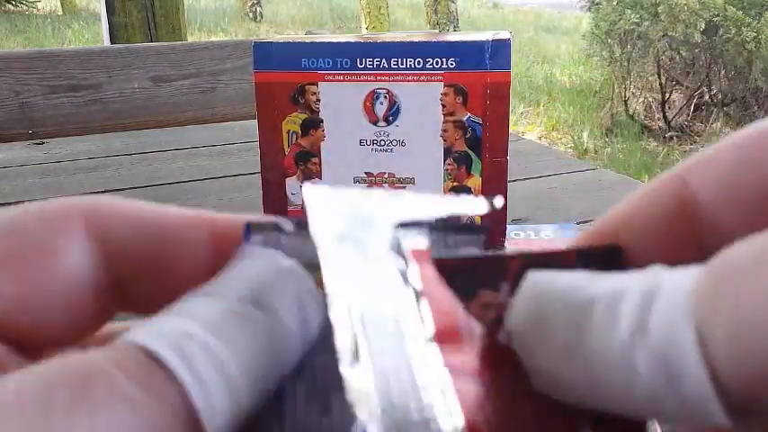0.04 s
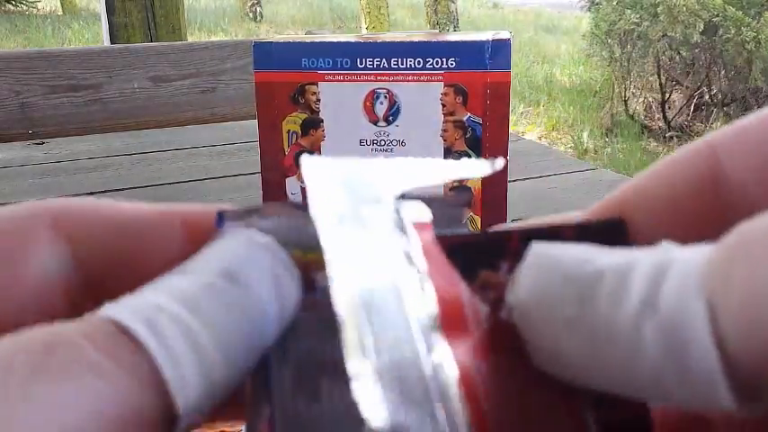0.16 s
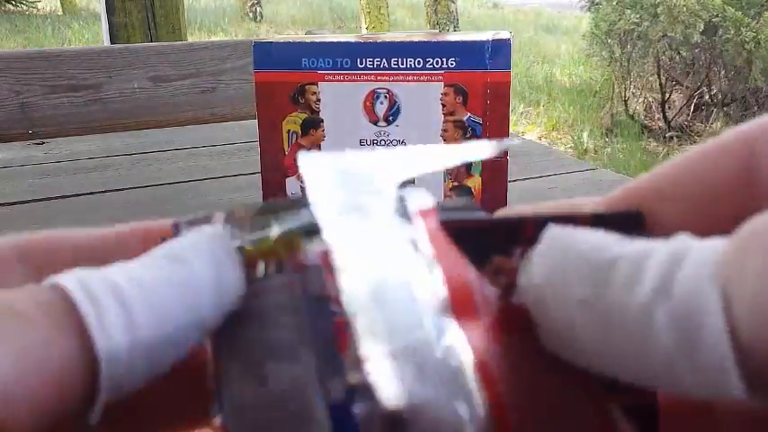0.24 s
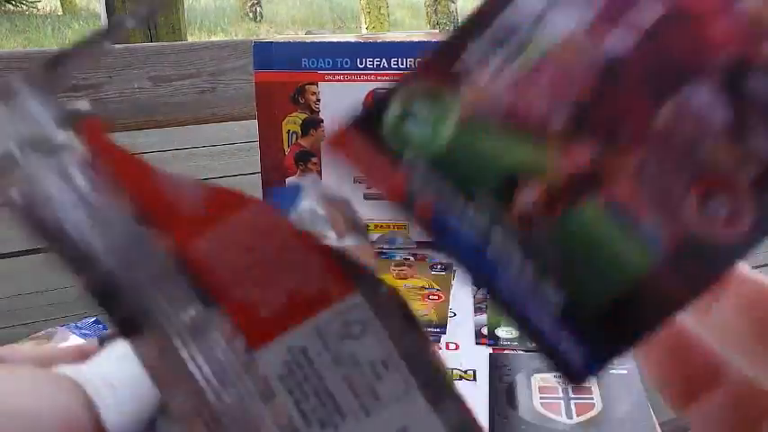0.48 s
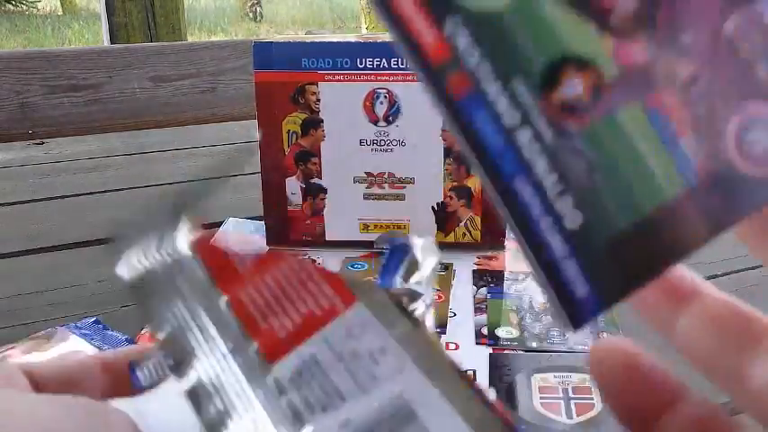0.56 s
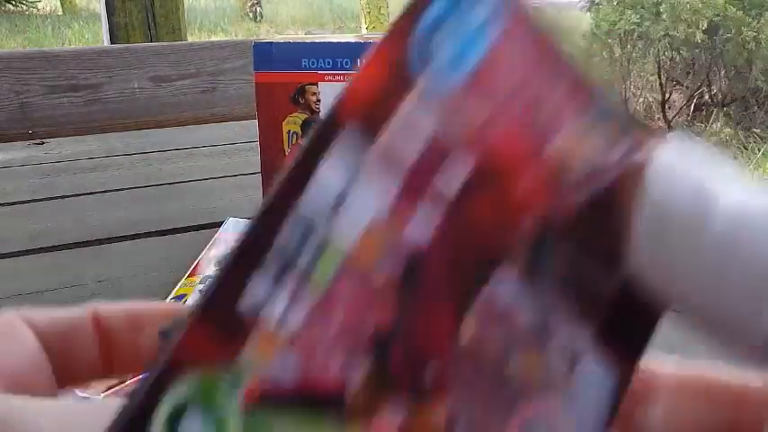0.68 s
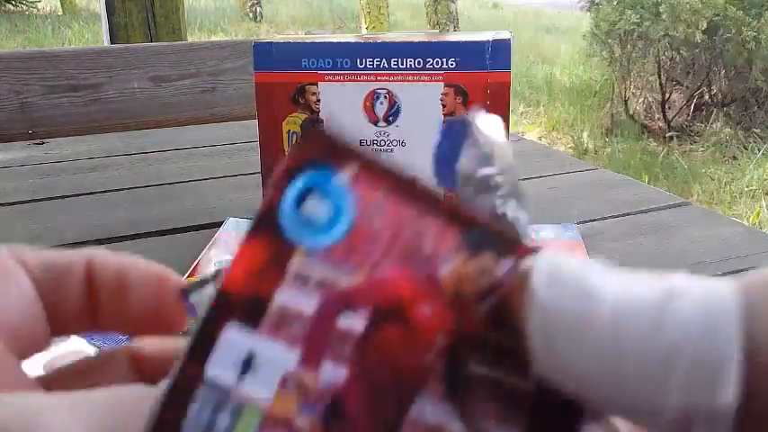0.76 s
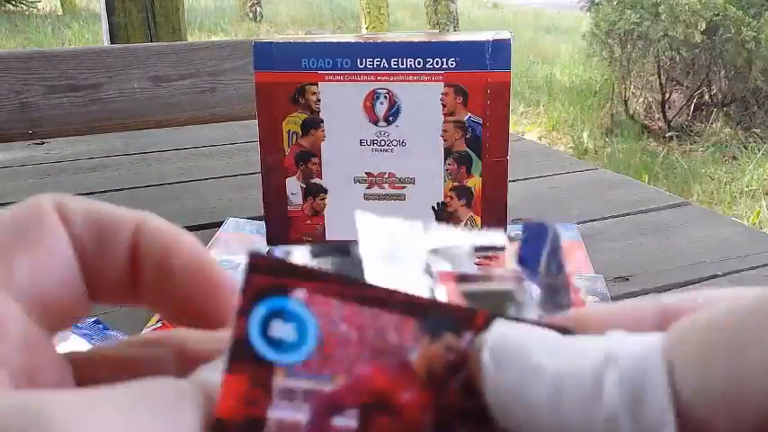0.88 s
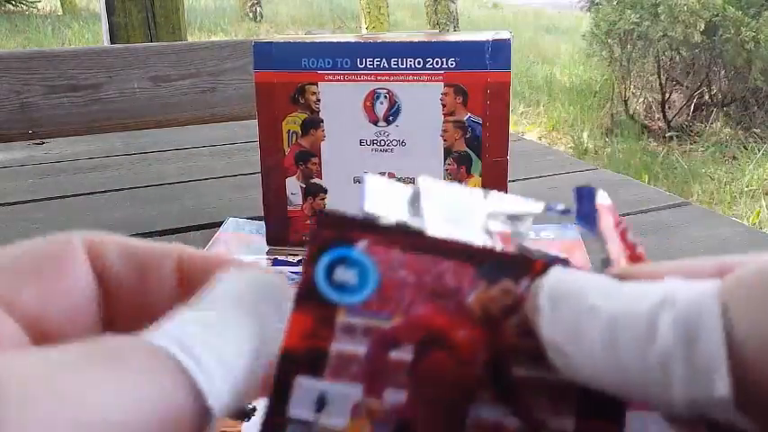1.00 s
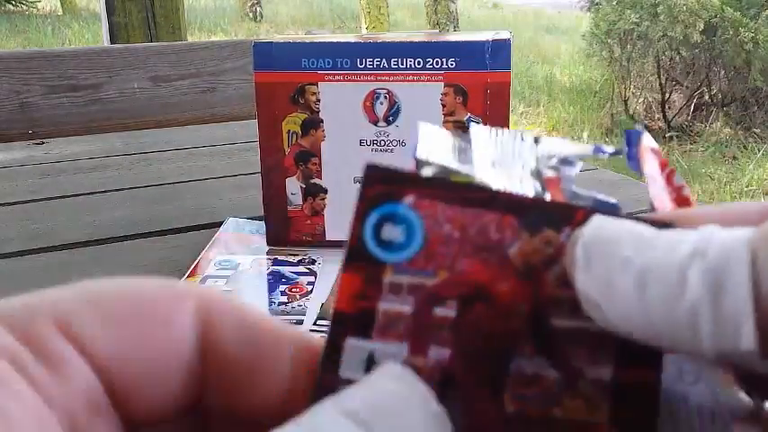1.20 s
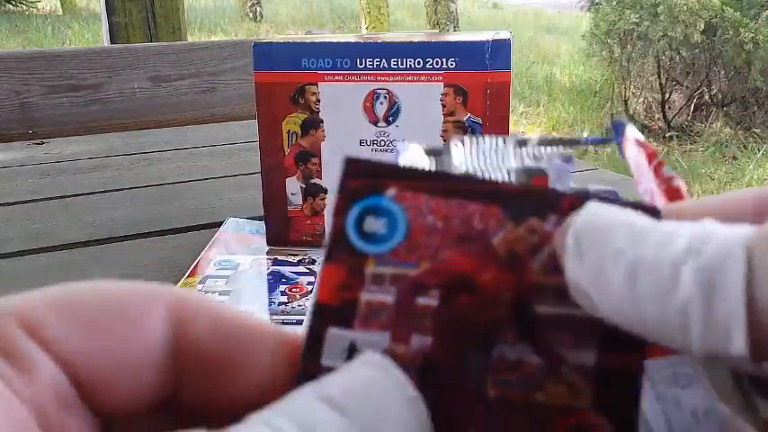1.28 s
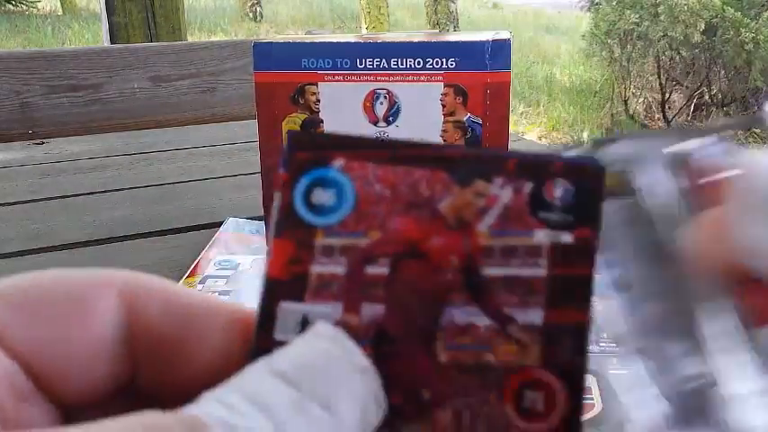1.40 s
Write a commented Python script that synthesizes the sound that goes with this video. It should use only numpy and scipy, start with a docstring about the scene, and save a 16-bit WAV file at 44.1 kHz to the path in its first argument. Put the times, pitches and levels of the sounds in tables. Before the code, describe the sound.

A foil packet crackles in the hands, very close, outdoors on a two-port camera microphone with dulled top treble. Sparse snaps begin at 0 s; dense, sharp crackle with low flexing runs 0.2-0.55 s. It quiets, then looser bursts return around 0.75-0.97 s. After a near pause from 1 s, a soft low card thud at 1.18 s and scattered snaps until 1.4 s. Faint rumble, hiss, rubbing; early wind puffs mostly left.

```python
"""Hands tear and crumple a small foil packet close to a two-port camera microphone, outdoors.
Rumble, hiss and a faint rub run throughout; puffs of wind, low tones mostly on the left, come in the first 1.1 s.
Crease snaps, short ringing noise bursts, start sparse over bouts of crackle made of tiny decaying grains.
They crowd from 0.2 to 0.55 s with low noise as the packet flexes, then thin out to a near pause after 1 s.
A card thuds once at 1.18 s, a pair of decaying low sines, and a few last snaps and crackles follow."""
import sys
import numpy as np
from scipy import signal
from scipy.fft import rfft, irfft, next_fast_len
from scipy.io import wavfile
from scipy.ndimage import uniform_filter1d, map_coordinates

SR = 44100
rng = np.random.default_rng(int(sys.argv[2]) if len(sys.argv) > 2 else 0)


def log_audio(samples):
    """Write samples as a 16-bit WAV file to the path given in sys.argv[1]."""
    # one column per channel
    frames = np.atleast_2d(samples).T
    # limit to full scale, then quantise
    limited = np.clip(frames, -1, 1)
    pcm = np.round(limited * 32767).astype(np.int16)
    wavfile.write(sys.argv[1], SR, pcm)


def magnitude_from_level(level_db):
    """Linear magnitude for a level in decibels (20 dB per decade)."""
    exponent = np.asarray(level_db, float) / 20
    return 10 ** exponent


N = 63945  # samples, 1.45 s


def unit(x):
    """Scales a sound or curve to rms 1."""
    return x / np.sqrt(np.mean(x ** 2) + 1e-20)


def along(points, hz):
    """Reads a curve of (Hz, value) points on a log pitch axis."""
    f, v = np.transpose(points)
    return np.interp(np.log(hz + 1), np.log(f + 1), v)


def wobble(rate):
    """A smooth random curve with rate knots a second."""
    knots = rng.standard_normal(int(N * rate / SR) + 4)
    return map_coordinates(knots, [np.arange(N) * rate / SR])


def filtered(x, response):
    """Multiplies the spectrum of x by a response of frequency."""
    m = next_fast_len(N + 8192)
    return irfft(rfft(x, m) * response(np.fft.rfftfreq(m, 1 / SR)), m)[..., :N]


def spans(start, length):
    """A gate that rises fast, holds and falls fast."""
    rise_s, fall_s = 0.00097, 0.0019
    t = np.arange(N) / SR
    return np.exp(np.minimum(0, np.minimum((t - start) / rise_s, (start + length - t) / fall_s)))


def patchy(patch_db):
    """Two noises with the same random patchiness in level over pitch and time."""
    z = signal.stft(rng.standard_normal((2, N + 256)), nperseg=128)[2]
    field = uniform_filter1d(rng.standard_normal(z.shape[1:]), size=3, axis=0)
    field = uniform_filter1d(field, size=3, axis=1)
    noise = signal.istft(z * magnitude_from_level(patch_db * unit(field)), nperseg=128)[1]
    return unit(noise[:, :N])


def foil_sound(dull, bright, pan, low_hz):
    """Colours a dull and a bright share of two noises by the foil and spreads them over both ports."""
    # Thin foil's spectrum, scaled to unit mean power. Each row: pitch in Hz, relative level in dB.
    foil_colour = [(59, -47), (100, 9), (265, 5.5), (480, -6), (673, -5.5), (2870, -4), (3940, -1.5),
                   (4710, -0.5), (7140, 0), (10600, -10), (11500, -25), (15000, -52), (22000, -120)]
    # Balance of the ports. Each row: pitch in Hz, left over right in dB.
    port_balance = [(60, -4), (300, -4.5), (620, -9), (1120, -3), (2010, -3), (3610, 0.5), (5500, -0.5),
                    (7000, -5.5), (8500, -13), (11600, -18.5)]
    # Likeness of the ports. Each row: pitch in Hz, share of the left sound common with the right (0 to 1).
    port_likeness = [(200, 0.27), (1000, 0.9), (2500, .3), (6000, .1)]
    tilt_hz = 3780  # crossover between dull and bright
    left_lag_s = 0.0001
    grid = np.linspace(0, SR / 2, 999)
    scale = np.sqrt(np.mean(magnitude_from_level(2 * along(foil_colour, grid))))

    def high(hz):
        return 1 / (1 + (tilt_hz / (hz + 1)) ** 2)

    def low(hz):
        return 1 - high(hz)

    def colour(hz):
        return magnitude_from_level(along(foil_colour, hz)) / scale / (1 + (low_hz / (hz + 1)) ** 2)

    def alike(hz):
        return np.clip(along(port_likeness, hz), 0, 0.99)

    def port(side):
        gain = pan ** side
        balance = lambda hz: colour(hz) * magnitude_from_level(side * along(port_balance, hz) / 2)
        return (filtered(bright * gain, lambda hz: high(hz) * balance(hz))
                + filtered(dull * gain, lambda hz: low(hz) * balance(hz)))

    common, own = port(1)
    left = filtered(common, lambda hz: alike(hz) * np.exp(-2j * np.pi * hz * left_lag_s))
    left = left + filtered(own, lambda hz: np.sqrt(1 - alike(hz) ** 2))
    right = port(-1)[0]
    return np.array([left, right])


def open_air():
    """Distant rumble and hiss: coloured noise that drifts in level, partly shared by the ports."""
    # Spectrum of the outdoor air. Each row: pitch in Hz, relative level in dB.
    air_colour = [(15, -31), (25, -10), (124, -5.5), (327, -20.5), (391, -19), (518, -19.5), (619, -20),
                  (1470, -40), (6120, -26), (11000, -59), (14300, -85), (22000, -120)]
    level_db, alike = -62, 0.22
    a, b = filtered(rng.standard_normal((2, N)), lambda hz: magnitude_from_level(along(air_colour, hz)))
    drift_db = 3.65 * wobble(11.86)
    return magnitude_from_level(level_db + drift_db) * unit(np.array([a + alike * b, b + alike * a]))


def wind_puffs():
    """Wind pushes the left port in low tones under bell-shaped swells; the right hears them 18 dB down."""
    # Puffs of wind. Each row: centre in seconds, left level in dB, pitch in Hz,
    # length in seconds (from the centre to 1/e).
    puffs = [(.02, -38.5, 72.4, 0.0043), (0.24, -52, 60, .012), (0.352, -51, 60, 0.017),
             (.875, -48, 70, .015), (0.057, -49, 71.4, 0.019), (0.145, -47.5, 81, .012),
             (0.185, -55.5, 91.8, 0.015), (0.437, -44.5, 70.4, 0.011), (0.486, -47, 83, 0.017),
             (0.619, -51.5, 67, 0.023), (0.84, -43.5, 72, 0.0064), (1.005, -49, 89, .012),
             (1.034, -50, 71.4, 0.016)]
    t = np.arange(N) / SR
    out = np.zeros(N)
    for s, db, hz, length in puffs:
        swell = np.exp(-((t - s) / length) ** 2)
        out += magnitude_from_level(db) * swell * np.sin(2 * np.pi * (hz * (t - s) + rng.random()))
    return out * magnitude_from_level([[0], [-18]])


def thuds():
    """Card and fingers push softly: low sines of a few cycles that die away, stronger on the right."""
    # Parts of the thud. Each row: start in seconds, level in dB (before rise and gains), pitch in Hz,
    # 60 dB decay in seconds.
    pushes = [(1.1807, -30.5, 214, .03), (1.181, -44, 119, 0.049)]
    rise_s = 0.006
    out, t = np.zeros(N + SR), np.arange(SR // 10) / SR
    for s, db, hz, t60 in pushes:
        shape = magnitude_from_level(db - 60 * t / t60) * (1 - np.exp(-t / rise_s))
        out[round(s * SR):][:len(t)] += shape * np.sin(2 * np.pi * hz * t) * 2
    return out[:N] * magnitude_from_level([[-2.5], [2.5]])


def flexing():
    """The whole packet bends: lumpy low noise in short spans, stronger on the right."""
    # Bends of the packet. Each row: start in seconds, length in seconds, level in dB (before port gains).
    bends = [(0.129, 0.035, -57.5), (0.229, 0.016, -43), (0.299, 0.0069, -50.5), (0.332, 0.027, -42),
             (0.354, 0.02, -47), (0.433, 0.0076, -44.5), (0.469, 0.032, -48), (0.529, 0.01, -53),
             (0.661, 0.041, -52.5), (0.768, 0.0083, -49.5), (0.864, 0.053, -60.5), (0.933, 0.042, -59),
             (1.265, 0.015, -55)]
    # Spectrum of the bending packet. Each row: pitch in Hz, relative level in dB.
    bend_colour = [(60, -35), (150, 2.5), (300, 5), (700, -4), (1400, -8.5), (22000, -120)]
    lumpy = rng.standard_normal((2, N)) * magnitude_from_level(1.6 * wobble(120))
    a, b = unit(filtered(lumpy, lambda hz: magnitude_from_level(along(bend_colour, hz))))
    level = sum(magnitude_from_level(db) * spans(s, length) for s, length, db in bends)
    level = uniform_filter1d(level, size=SR // 300)
    return level * np.array([0.72 * a + 0.73 * b, a]) * magnitude_from_level([[-3.5], [3]])


def crackle():
    """Fingers work the foil: clumped tiny creases of scattered size, over a faint rub on the film."""
    # Bouts of fine crackle. Each row: start in seconds, length in seconds, level in dB (before colouring),
    # brightness in dB (bright over dull).
    bouts = [(.0, 0.012, -48.5, 2), (.017, 0.0061, -56.5, -25.5), (0.124, 0.021, -49, 10),
             (0.159, 0.0078, -51, 2), (0.189, 0.049, -48.5, 5), (.223, 0.0061, -35, 5),
             (.231, 0.0082, -29.5, 10.5), (0.242, 0.0046, -32, 3), (0.254, 0.019, -39.5, 13),
             (.275, 0.009, -33.5, -1.5), (0.3, 0.011, -29, 2), (.313, 0.0092, -34.5, 13),
             (0.327, 0.0094, -26, 5), (0.345, 0.032, -25.5, -5), (0.38, 0.021, -33, 7.5),
             (.403, 0.0067, -30, -3), (.418, 0.024, -28.5, 2.5), (0.443, 0.023, -39.5, -2),
             (0.471, 0.0093, -38, 5), (0.483, 0.0076, -33.5, -3.5), (0.49, 0.014, -52, -17),
             (.512, 0.012, -42, 5), (0.524, 0.015, -52, 6), (.536, 0.0097, -38, 9), (0.549, 0.023, -58, 24),
             (0.578, 0.036, -55, -6), (0.653, 0.0084, -47.5, -1), (0.669, .017, -52, -15),
             (.682, 0.033, -47.5, -9.5), (0.74, 0.0086, -49.5, -6), (.755, 0.0092, -43.5, 11),
             (0.77, 0.0079, -50, 2), (0.782, 0.011, -41, 5), (.795, 0.0057, -55, 18),
             (0.812, 0.023, -43.5, -4), (.84, 0.02, -45.5, 3), (0.867, 0.0078, -32, -3),
             (.876, 0.019, -38, -6), (.896, .016, -35, -3.5), (0.915, .022, -40, -3.5),
             (0.93, 0.025, -46.5, -8), (0.954, 0.017, -36, -3), (0.979, 0.0038, -58, 13),
             (.986, 0.0047, -54.5, -10), (1.008, 0.0079, -51, -2), (1.099, 0.014, -61, -7),
             (1.183, 0.011, -41.5, -15.5), (1.202, 0.046, -56.5, -13), (1.256, 0.0028, -51.5, -21),
             (1.266, .012, -48, 1), (1.283, 0.011, -52.5, 1), (1.307, 0.023, -50, 1),
             (1.39, 0.0072, -50, -17)]
    # Rub of fingers on film, joined by lines. Each row: time in seconds, level in dB (before colouring).
    rub_levels = [(0, -62), (.05, -68), (.07, -52.5), (.115, -59), (.18, -55.5), (.6, -64.5), (0.648, -63),
                  (.73, -58.5), (1.0, -77), (1.052, -81), (1.075, -65), (1.095, -84), (1.105, -66.5),
                  (1.15, -56), (1.172, -70), (1.3, -65.5), (1.35, -66.5), (1.385, -69), (1.4, -58),
                  (1.45, -56.5)]
    grains_per_s, grain_ms = 2500, 0.83  # grain_ms: decay to 1/e
    spread_db, cap_db = 3, 7  # scatter of the grain sizes
    clump_db, own_clump_db = 1.5, 2  # shared by both shares, and separate for each
    hits = rng.random(N) < grains_per_s / SR
    sizes = hits * magnitude_from_level(np.minimum(spread_db * rng.exponential(size=N), cap_db))
    grains = signal.lfilter([1], [1, -np.exp(-1000 / (grain_ms * SR))], sizes)
    grains = unit(grains * magnitude_from_level(clump_db * wobble(250)))
    dull, bright = np.zeros(N), np.zeros(N)
    for s, length, db, tilt_db in bouts:
        gate = spans(s, length)
        dull += magnitude_from_level(db - tilt_db / 2) * gate
        bright += magnitude_from_level(db + tilt_db / 2) * gate
    rub = magnitude_from_level(np.interp(np.arange(N) / SR, *np.transpose(rub_levels)))
    noise = patchy(4.5)
    dull = noise * (dull * grains * magnitude_from_level(own_clump_db * wobble(150)) + rub)
    bright = noise * (bright * grains * magnitude_from_level(own_clump_db * wobble(150)) + rub)
    return foil_sound(dull, bright, np.ones(N), low_hz=523)


def snaps():
    """Each crease buckles at once and rattles out in a few milliseconds, with small resonances of its own."""
    # Single crease snaps. Each row: time in seconds, level in dB (before colouring), length in ms,
    # brightness in dB (bright over dull), left over right in dB (on top of the port balance).
    creases = [(0.004, -40.5, 1.4, 21, 4), (0.01, -26.5, 1.54, 7.5, -4), (0.0246, -44, 2.3, -29.5, -3),
               (0.0639, -24.5, 1.12, 4.5, -7), (0.1208, -37, 1.46, 5, -5), (0.1299, -31.5, 2.2, -9, -1),
               (0.142, -28.5, 2.6, -2, -5), (0.1503, -51, 4.6, 23, 5), (0.162, -34.5, 1.5, 6, -7),
               (0.189, -52, 1.7, 12, -2), (0.1986, -32, 1.5, -3, -11), (0.2111, -40, 4.4, 11, -6),
               (0.2175, -25, 1.13, 5, -11), (0.2247, -29.5, 1.5, 17.5, -7), (0.23, -14.5, 0.68, 3, -2.5),
               (0.2348, -24, 4.7, 0, -2), (0.2447, -22.5, 2.2, -4, 1), (0.2506, -40, 3.5, 9, 6),
               (0.268, -16.5, 1.13, 3, -8), (0.2837, -28, 5.1, -2, -2), (0.2967, -25, 3.7, 8, 10),
               (0.3038, -16, 1.14, -4.5, -11.5), (0.307, -31, 1.8, 2, -8), (0.3156, -21.5, 2.5, -3, -13),
               (0.3326, -17, 7.9, 5.5, -4.5), (0.3407, -18.5, 4.5, 0, -4), (0.3499, -25, 4.4, -4, -8),
               (0.3552, -20.5, 4.5, -7, -7), (0.3664, -25, 3.4, 3, -7), (0.3698, -20.5, 5.2, -6, -4),
               (0.381, -16.5, 1.95, -1, -5), (0.3875, -21, 2.3, 14.5, 3), (0.3954, -26, 1.4, 12, -9),
               (0.4116, -24, 2.5, -6, 12), (0.418, -28.5, 2.6, -2, -8), (0.4272, -21, 1.7, -10, -6),
               (0.436, -16.5, 2.8, 0, -7), (0.458, -17.5, 4.1, 5.5, -2.5), (0.4891, -22, 3.3, -3, -4),
               (0.5194, -30.5, 1.6, 6, 1), (0.5271, -28.5, 2.4, 12, -7), (0.5308, -31, 1.9, 6, -1),
               (0.5381, -15, 2.23, 6.5, -5.5), (0.5545, -34, 5.6, 12, 1), (0.5618, -27, 3.1, 5, -1),
               (0.5709, -36, 0.8, 21, -8), (0.596, -41.5, 3.6, 2, -3), (0.6567, -39, 1.3, 7, -4),
               (0.6717, -41, 2.4, -15, 0), (0.6864, -35, 1.6, -14, -9), (0.6962, -34.5, 2, 7, -8),
               (0.7, -33, 1.56, 15.5, -4), (0.7559, -28, 1.5, -5, -6), (0.7732, -17, 2.24, -2, -5.5),
               (0.7862, -31, 3.4, 4, -1), (0.789, -36, 2.8, -11, 9), (0.8112, -35, 2, -3, -1),
               (0.823, -26.5, 2, -4, -3), (0.8265, -19, 2.7, -1, -5.5), (0.8411, -29, 2.1, 1, -3),
               (0.8471, -34, 2.5, -5, 4), (0.87, -22, 3.1, 5, -1), (0.877, -18, 3.3, -9, -8.5),
               (0.8891, -34, 1.9, 0, 6), (0.9017, -24.5, 4.6, 5, 1.5), (0.9191, -49, 1.3, -1, 2),
               (0.9313, -21.5, 1.2, -6, 1), (0.9575, -34, 3.5, -10, 4), (0.9664, -34, 2.1, -11, -9),
               (0.9687, -34, 2.4, -2, 2), (0.9875, -36, 2.26, -23, -1), (1.0069, -38, 2, -17, 3),
               (1.0644, -33.5, 2.43, -10, 5), (1.1917, -36, 1.75, -15, -4.5), (1.2097, -51, 2, -8, 13),
               (1.23, -39, 1.4, -3, 2), (1.2683, -27, 3.5, -4, 3.5), (1.2741, -26.5, 1.96, -0.5, -4.5),
               (1.2867, -35.5, 2, -13, 0), (1.3097, -33.5, 3, -3, 2.5), (1.3182, -35, 2.6, -3, -5),
               (1.3691, -44, 3.2, -20, -1), (1.3917, -24.5, 1.65, -5.5, -2)]
    rise, lead = 0.05, 0.03  # shares of the length
    decay_db, end_db = 8.5, 3  # fall over one length: the steady part and the part that speeds up
    ring_db = 4  # rms height of the resonances
    dull, bright = np.zeros((2, N + SR)), np.zeros((2, N + SR))
    pan, ms = np.ones(N + SR), np.arange(512) / SR * 1000
    for s, db, length, tilt_db, pan_db in creases:
        u = ms / length
        shape = (1 - np.exp(-u / rise)) ** 2 * magnitude_from_level(-decay_db * u - end_db * u ** 2)
        noise = rng.standard_normal((2, len(ms)))
        ripple = uniform_filter1d(rng.standard_normal(len(ms) // 2 + 1), size=9)
        burst = shape * irfft(rfft(noise) * magnitude_from_level(ring_db * unit(ripple)), len(ms))
        # every burst gets the energy of its shape
        burst = burst * np.linalg.norm(shape) / np.linalg.norm(burst, axis=1, keepdims=True)
        k = round((s - lead * length / 1000) * SR)
        dull[:, k:k + len(ms)] += magnitude_from_level(db - tilt_db / 2) * burst
        bright[:, k:k + len(ms)] += magnitude_from_level(db + tilt_db / 2) * burst
        pan[k:k + len(ms)] = magnitude_from_level(pan_db / 2)
    return foil_sound(dull[:, :N], bright[:, :N], pan[:N], low_hz=885)


def scene():
    """Open air and wind, the thud, the flexing packet, and the foil's crackle and snaps."""
    return open_air() + wind_puffs() + thuds() + flexing() + crackle() + snaps()


def low_pass(x):
    """Removes everything above the highest recorded frequency."""
    return signal.sosfilt(signal.butter(12, 12240, fs=SR, output="sos"), x)


def record(dry):
    """The camera's steep band limit removes the top treble."""
    top_hz = 11126
    mix = filtered(dry, lambda hz: 1 / (1 + (hz / top_hz) ** 90))
    return low_pass(mix)


dry = scene()
out = record(dry)
log_audio(out)
```